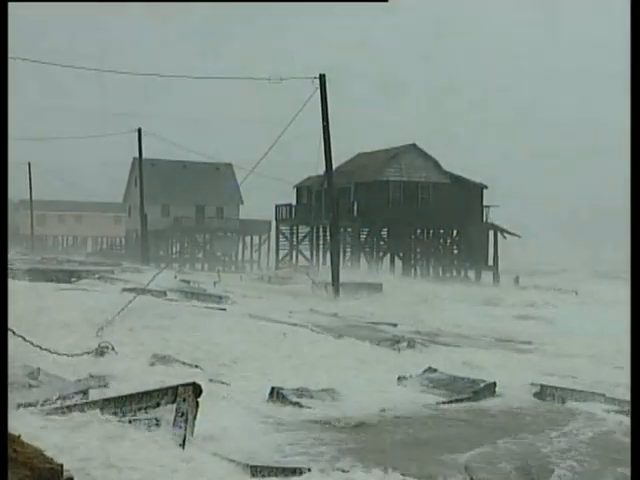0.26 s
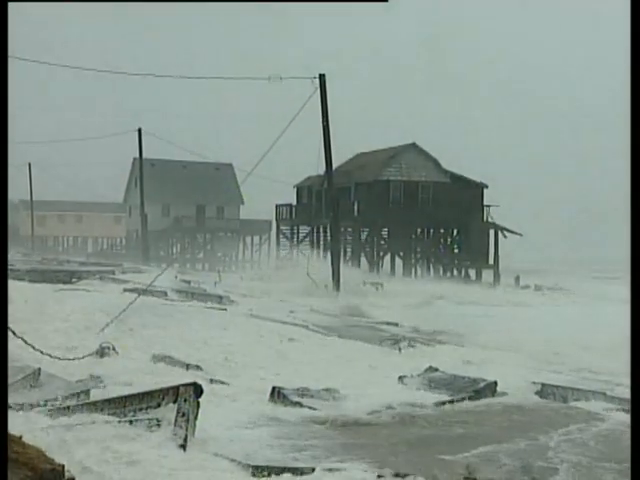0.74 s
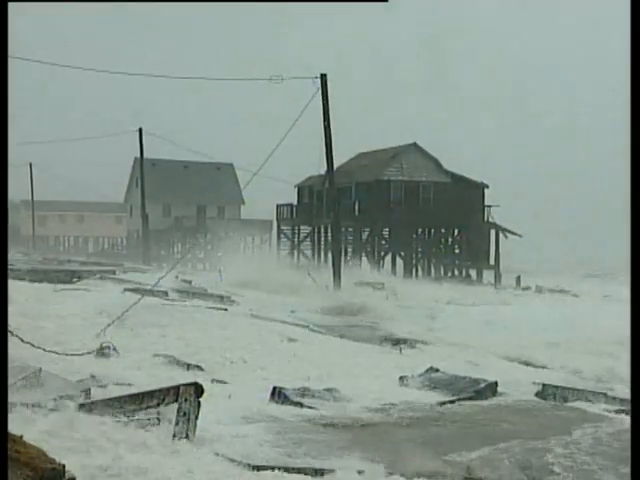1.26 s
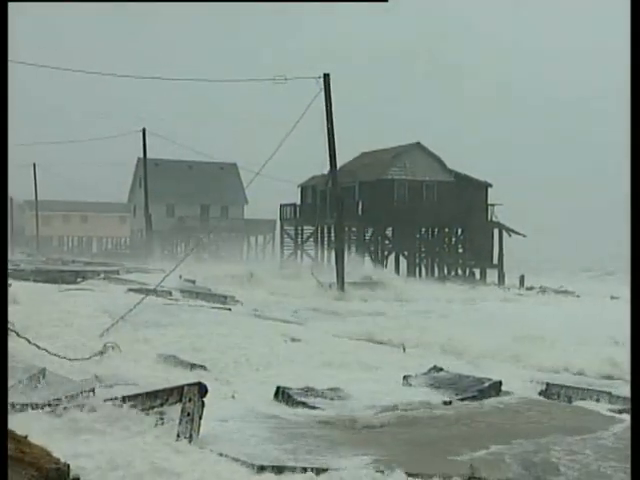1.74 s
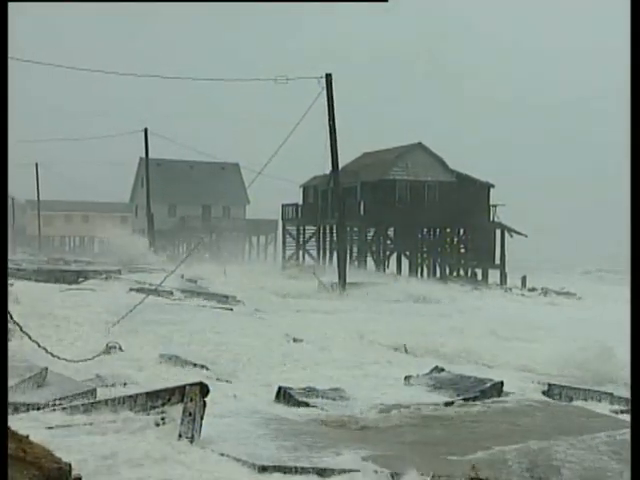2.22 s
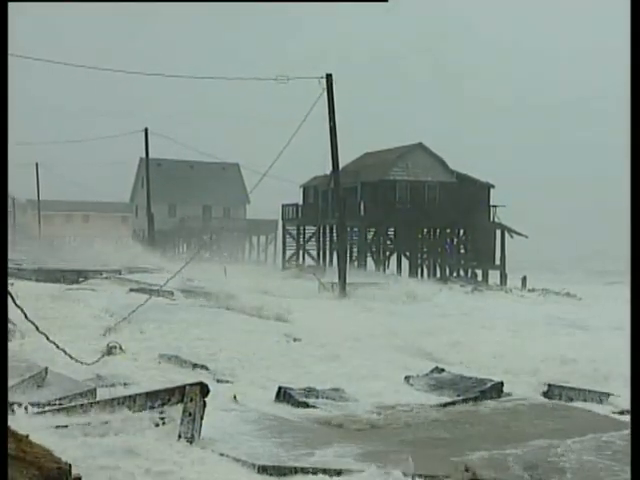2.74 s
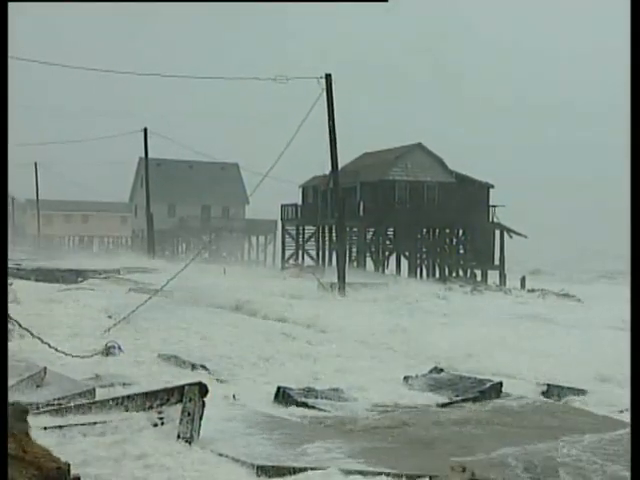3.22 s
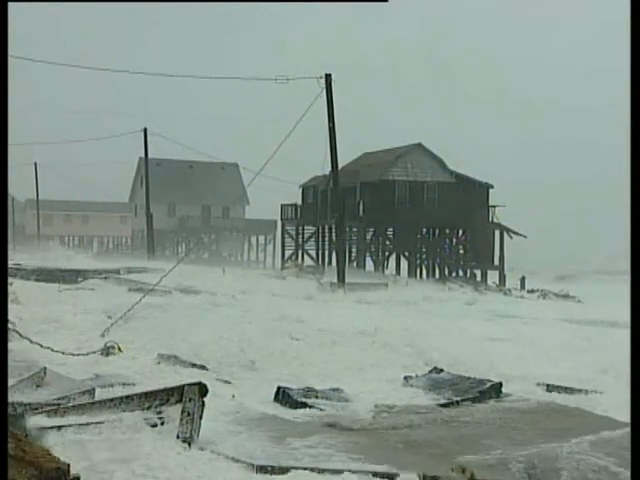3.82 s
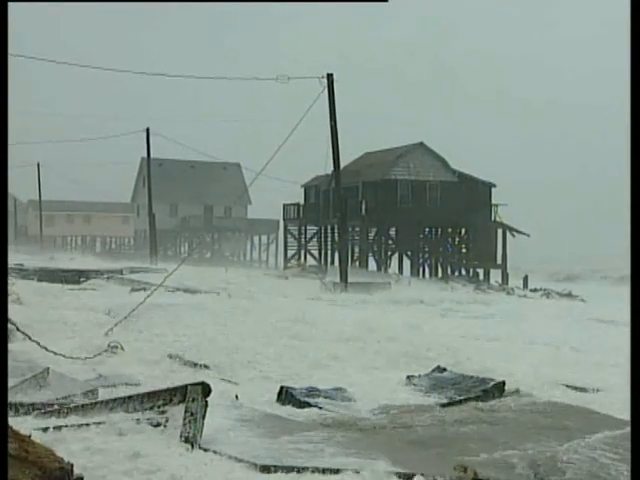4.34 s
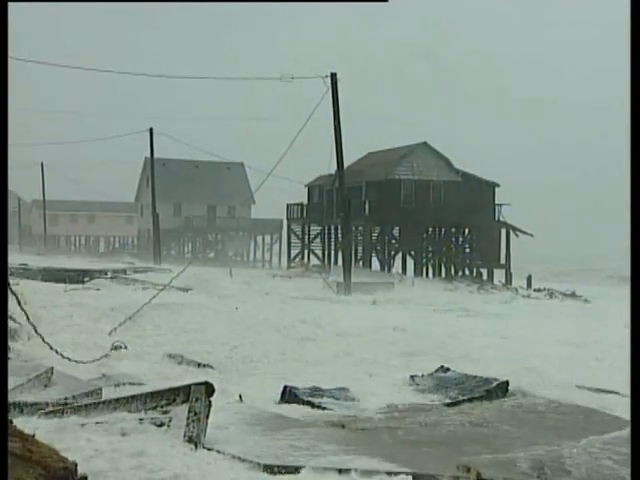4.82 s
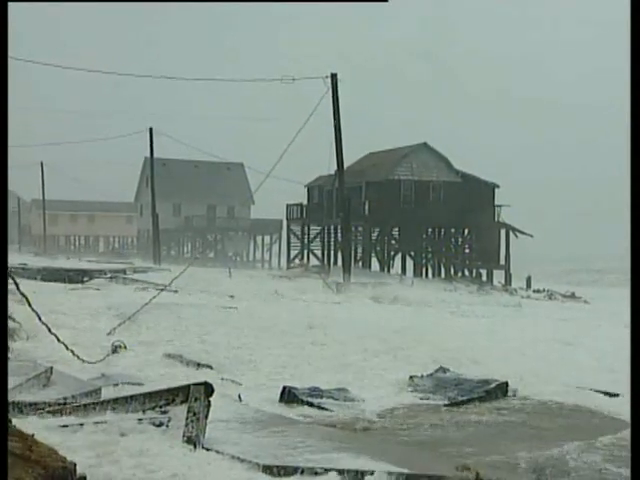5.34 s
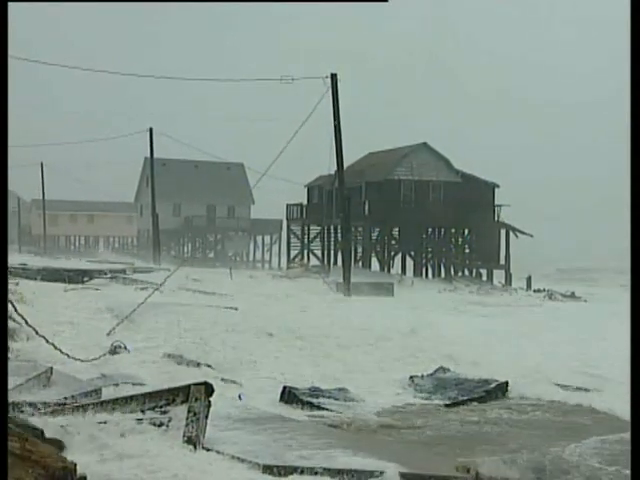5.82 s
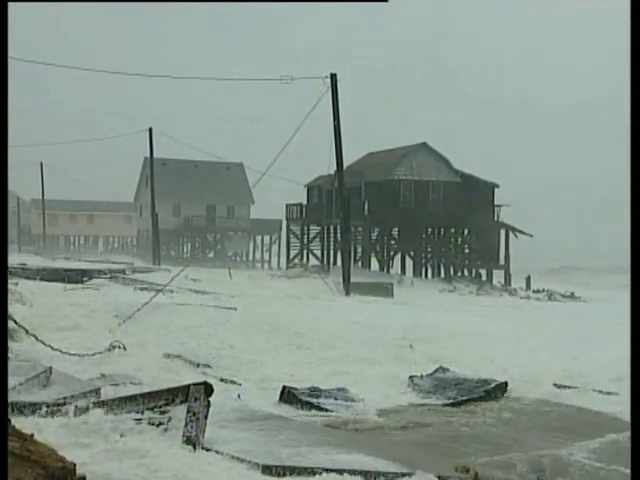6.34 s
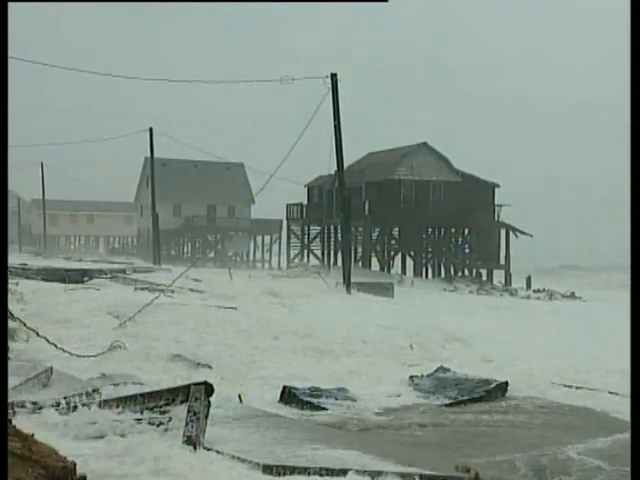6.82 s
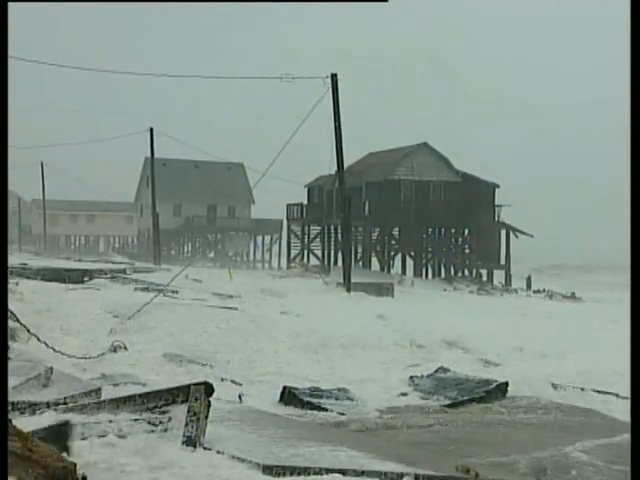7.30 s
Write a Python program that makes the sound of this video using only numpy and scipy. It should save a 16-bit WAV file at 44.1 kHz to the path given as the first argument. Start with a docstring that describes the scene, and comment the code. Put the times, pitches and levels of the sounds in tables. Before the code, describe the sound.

Hurricane wind hits an unprotected camera microphone on a surf-flooded beach, overloading it from start to finish. The sound is a ragged, clipped rumble and tearing crackle, with hissing surf and spray buried behind. It begins coarse and loud, turning finer by 0.75 s and again near 1.75 s, with quick flares around 0.8, 1.2 and 1.65 s. Near 2.45 s hard shoves choke it briefly and release with pops; a sharp, fine blast rips at 2.9 s. From 3.2 to 4.5 s it eases into coarser, lower buffeting, with lone pops near 4.2 s and bursts at 4.4-4.6 s. Fine crackle returns by 5.6 s; a thin lull at 5.75-5.85 s holds several tiny pops, then a longer choke releases at 5.92 s. It sinks to coarse rumble near 6.35 s, then crackles finely again to an abrupt end. Left side only; the right has barely audible hiss.

```python
"""Hurricane wind overloads a camera microphone: eddies flip it between two limits, a tearing crackle.
The crackle swells slowly, flares in blasts and thins in lulls; lone eddies pop within some lulls.
Hard shoves pin the microphone for milliseconds, and it lets go with a pop.
Behind, surf and spray are noise added to the overloaded swing, hushed while it is pinned.
All this is on the left channel; the right holds only faint hiss."""
import sys
import numpy as np
from scipy import signal
from scipy.fft import rfft, irfft, next_fast_len
from scipy.io import wavfile
from scipy.ndimage import uniform_filter1d

SR = 44100
rng = np.random.default_rng(int(sys.argv[2]) if len(sys.argv) > 2 else 0)


def persist_wave(psi):
    """Save psi, clipped to +-1, as 16-bit WAV."""
    counts = np.round(np.clip(psi, -1, 1) * 32767).astype(np.int16)
    wavfile.write(sys.argv[1], SR, np.atleast_2d(counts).T)


N = 333837

# Pressure spectra, shape only: freq_hz, density_db_per_hz
COARSE_EDDY_SPECTRUM = [(8, -16), (30, 2.5), (100, -3.5), (300, -8), (1000, -17), (4000, -36.5),
                        (16000, -70)]
FINE_EDDY_SPECTRUM = [(50, -11), (400, -0.5), (1500, -3), (5000, -8.5), (16000, -17)]
# Slow swell of the gale: time_s, fine_over_coarse_db, crackle_level_db
GALE_SWELL = [(0, -7.5, -20.5), (0.5, -3.5, -20), (0.75, -2, -20.5), (1.2, -5, -19.5), (1.5, -3, -22),
              (1.75, -0.5, -19.5), (2.05, -2.5, -22.5), (2.4, -2.5, -23), (2.8, -0.5, -21),
              (3.2, -4, -24.5), (3.6, -7, -24.5), (3.87, -8, -23), (4.33, -11.5, -28.5), (4.5, -12.5, -23),
              (5.05, -5, -22.5), (5.6, 0, -23), (6.35, -10, -21.5), (6.95, -3, -23), (7.57, -1.5, -24)]
# Blasts that tear at the microphone: start_s, length_s, louder_db, finer_db
BLASTS = [(0.195, 0.078, 1, 0.5), (0.837, 0.029, 4, 1), (1.026, 0.057, 1.5, -0.5), (1.18, 0.13, 1.5, 2),
          (1.655, 0.073, 1, -1.5), (1.96, 0.028, 1.5, 5), (2.461, 0.056, 4, -2.5), (2.75, 0.044, 1, 3.5),
          (2.89, 0.046, 3.5, 14), (2.943, 0.11, 3, -1), (3.238, 0.035, 3, -0.5), (4.122, 0.067, 3.5, 5),
          (4.44, 0.028, 5.5, 3.5), (4.615, 0.098, 2, 4.5), (4.944, 0.069, 1.5, 0), (5.681, 0.049, 5.5, 8),
          (5.79, 0.023, 5.5, -17), (5.933, 0.025, 4, -4), (6.348, 0.062, 1.3, -1), (7.176, 0.035, 3, -4)]
# Lulls, microphone resting near one limit: start_s, length_s, pull_spreads (negative = push), quieter_db
LULLS = [(0.102, 0.069, 0.79, 3), (0.284, 0.033, 0.89, 1.5), (0.7, 0.037, 0.49, 2.1),
         (0.893, 0.064, 1.3, 2.8), (1.102, 0.029, 2.1, 3), (1.349, 0.044, 1.7, 6.5), (1.773, 0.15, 0.9, 1),
         (2.043, 0.045, 0.8, 1.5), (3.062, 0.078, 1.6, 2.5), (3.283, 0.046, 0.72, -1.5),
         (3.958, 0.078, 0.75, 2), (4.184, 0.13, 1.27, -1.5), (4.31, 0.039, 0.3, 1), (4.755, 0.076, 0.84, 5),
         (4.838, 0.057, 0.025, 3.5), (5.438, 0.17, 0.93, 0), (5.75, 0.09, 2.3, 10.5),
         (5.988, 0.057, 1.4, 2.5), (6.12, 0.086, 1.5, 4.5), (6.205, 0.062, 0.13, 8),
         (6.282, 0.055, -0.53, 3.5), (6.561, 0.075, 0.5, 3), (6.758, 0.13, 0.18, 3), (7.078, 0.047, 1, 1),
         (7.39, 0.064, 0.96, 1), (7.528, 0.06, 0.6, 0)]
# Shoves that pin the microphone: release_time_s, length_s, hush_db
SHOVES = [(0.31, 0.008, 6), (0.348, 0.01, 10.5), (0.454, 0.015, 8), (0.836, 0.0081, 10), (1.03, 0.019, 33),
          (1.164, 0.018, 8.5), (1.974, 0.0064, 19), (2.447, 0.027, 22), (2.468, 0.017, 33),
          (2.659, 0.0095, 9.5), (2.732, 0.0066, 13.5), (2.839, 0.0082, 11.5), (2.869, 0.0075, 24),
          (3.216, 0.0077, 9), (3.25, 0.003, 24), (4.062, 0.013, 14.5), (4.12, 0.0098, 1.5),
          (4.198, 0.011, 13), (4.237, 0.008, 16), (4.296, 0.013, 16), (4.364, 0.019, 7),
          (4.611, 0.013, 6.5), (4.707, 0.0086, 12.5), (4.929, 0.018, 12.5), (5.178, 0.0077, 17),
          (5.219, 0.011, 7.5), (5.398, 0.007, 17.5), (5.583, 0.0088, 18.5), (5.674, 0.024, 14),
          (5.829, 0.013, 9.5), (5.923, 0.061, 29.5), (6.059, 0.017, 9.5), (6.274, 0.018, 14),
          (6.44, 0.011, 11.5), (6.742, 0.011, 7.5), (7.153, 0.014, 11.5), (7.183, 0.022, 15.5),
          (7.281, 0.0085, 18.5)]
# Lone eddies that flip the microphone over and back within a lull: start_s, length_s
POPS = [(4.199, 0.0016), (4.266, 0.0027), (5.7625, 0.00043), (5.771, 0.0004), (5.783, 0.0012),
        (5.796, 0.00197), (5.833, 0.00075)]
# Spectrum of the random level flutter, shape only: freq_hz, density_db_per_hz
FLUTTER_SPECTRUM = [(3, -9), (8, -1), (25, 6), (80, -28), (1000, -80)]
# Wash spectra, shape only: freq_hz, density_db_per_hz
SURF_SPECTRUM = [(20, 2), (150, -2), (600, -8.5), (2000, -7.5), (16000, -23.5)]
SPRAY_SPECTRUM = [(100, -15), (1000, -7), (4000, -6), (16000, -8)]
# Microphone colour: freq_hz, gain_db
MIC_COLOUR = [(25, 4), (60, 0.3), (150, 0), (400, -0.5), (1000, 0.03), (2500, 0.2), (6000, 0.5),
              (11000, 0.96), (16000, 0.4)]

# Pressures are in spreads (rms) of the eddy pressure
LEAN_SPREADS, POP_PUSH_SPREADS = -0.38, 2.3   # LEAN: steady pressure between events
BLAST_ATTACK_S, BLAST_RELEASE_S, LULL_EDGE_S = 0.0053, 0.016, 0.024
LULL_FINER_DB_PER_SPREAD = 5
FLUTTER_RMS_DB = 0.85
NUDGES_PER_S, NUDGE_S, NUDGE_MEAN_HUSH_DB = 1.5, 0.0059, 4.5
# Build-up ahead of a shove of FULL_SHOVE_DB or more; less for weaker ones
MOUNT_S, MOUNT_PUSH_SPREADS, MOUNT_COARSER_DB, MOUNT_QUIETER_DB = 0.034, 1.29, 8.5, 3.5
FULL_SHOVE_DB = 20.5
COUPLING_HZ, CUTOFF_HZ = 23, 15900
RIGHT_HISS_DB = -86.5   # ahead of the microphone colour


def wind_pressure(steady, fine_share, slack):
    """Coarse buffets and fine eddies ride on the steady push; as it slackens, fine eddies take over."""
    coarse_share = np.sqrt(1 - fine_share ** 2)   # total eddy power stays 1
    push = steady + coarse_share * noise(COARSE_EDDY_SPECTRUM)
    return (1 - slack) * push + fine_share * noise(FINE_EDDY_SPECTRUM)


def overloaded(pressure, wash, drive, top_hardness):
    """The microphone saturates at two limits; slightly less wash passes near the upper, harder one."""
    swing = np.tanh(drive * pressure)
    wash_gain = 1 - np.clip(top_hardness, 0, 1) * swing
    return swing + wash * wash_gain


def gale():
    """Blasts, lulls and mounting shoves shape the swell: steady pressure, fineness in dB, level in dB."""
    fine_db, level_db = in_time(GALE_SWELL)
    mount = mounting()
    steady = LEAN_SPREADS + MOUNT_PUSH_SPREADS * mount
    fine_db = fine_db - MOUNT_COARSER_DB * mount
    level_db = level_db - MOUNT_QUIETER_DB * mount
    for start_s, length_s, louder_db, finer_db in BLASTS:
        blast = plateau(start_s, length_s, BLAST_ATTACK_S, BLAST_RELEASE_S)
        level_db += louder_db * blast
        fine_db += finer_db * blast
    for start_s, length_s, pull_spreads, quieter_db in LULLS:
        lull = plateau(start_s, length_s, LULL_EDGE_S, LULL_EDGE_S)
        steady -= pull_spreads * lull
        fine_db += LULL_FINER_DB_PER_SPREAD * pull_spreads * lull
        level_db -= quieter_db * lull
    flutter_db = FLUTTER_RMS_DB * noise(FLUTTER_SPECTRUM)
    return steady, fine_db, level_db + flutter_db


def mounting():
    """Pressure mounts exponentially ahead of each shove and is gone at its release, 0-1."""
    t, mount = np.arange(N) / SR, np.zeros(N)
    for end_s, length_s, hush_db in SHOVES:
        lead_s = end_s - length_s - t
        rise = np.exp(-np.clip(lead_s / MOUNT_S, 0, 20)) * (t < end_s)
        mount = np.maximum(mount, min(hush_db / FULL_SHOVE_DB, 1) * rise)
    return mount


def shoves(build_share, release_s, rebound_s):
    """A shove squeezes the microphone, then lets go: share of travel left, and rebound after it (0-1)."""
    t, hush_db, rebound = np.arange(N) / SR, np.zeros(N), np.zeros(N)
    for end_s, length_s, depth_db in list(SHOVES) + nudges():
        since_s = t - end_s
        build = np.clip((since_s + length_s) / (build_share * length_s) + .5, 0, 1)
        release = np.clip(.5 - since_s / release_s, 0, 1)
        hush_db = np.maximum(hush_db, depth_db * build * release)
        decay = np.exp(-np.clip(since_s / rebound_s, 0, 20))
        rebound = np.maximum(rebound, (since_s > 0) * decay)
    return from_db(-hush_db), rebound


def nudges(count=60):
    """Slight shoves at random moments (exponential gaps), as rows like SHOVES."""
    draws = rng.random((count, 2))
    ends_s = np.cumsum(-np.log(1 - draws[:, 0])) / NUDGES_PER_S
    hushes_db = NUDGE_MEAN_HUSH_DB * (.5 + draws[:, 1])
    return [(end_s, NUDGE_S, hush_db) for end_s, hush_db in zip(ends_s, hushes_db) if end_s < N / SR]


def pops():
    """Lone eddies: short rectangular kicks of pressure."""
    t = np.arange(N) / SR
    return POP_PUSH_SPREADS * sum((t >= start_s) & (t < start_s + length_s) for start_s, length_s in POPS)


def crackle_rms(swing, low_hz, window_s):
    """Running rms of the crackle above the rumble, with a small floor."""
    highpass = signal.butter(2, low_hz, "high", fs=SR, output="sos")
    power = signal.sosfilt(highpass, swing) ** 2
    width = int(window_s * SR)
    smooth_power = uniform_filter1d(uniform_filter1d(power, width), width)
    return np.sqrt(smooth_power + 1e-3)


def sagging(swing):
    """The microphone's coupling lets held pressure sag to zero, so releases thump."""
    return signal.sosfilt(signal.butter(2, COUPLING_HZ, "high", fs=SR, output="sos"), swing)


def sea(fine_share, surf_db, spray_db):
    """Surf is steady noise; blown spray is noise that thickens with the fine eddies."""
    surf = from_db(surf_db) * noise(SURF_SPECTRUM)
    spray = from_db(spray_db) * fine_share * noise(SPRAY_SPECTRUM)
    return surf + spray


def noise(spectrum):
    """Gaussian noise of the given spectrum, rms 1."""
    x = coloured(rng.standard_normal(N), spectrum)
    return x / x.std()


def coloured(x, spectrum):
    """Filter by a curve of freq_hz, gain_db, interpolated over log frequency."""
    size = next_fast_len(N + SR // 4)
    hz, db = np.transpose(spectrum)
    bins_hz = np.maximum(np.fft.rfftfreq(size, 1 / SR), 1)
    gain = from_db(np.interp(np.log(bins_hz), np.log(hz), db))
    return irfft(rfft(x, size) * gain, size)[:N]


def plateau(start_s, length_s, attack_s, release_s):
    """Linear attack, hold and release, 0-1; the edges are centred on start and end."""
    since_s = np.arange(N) / SR - start_s
    attack = np.clip(since_s / attack_s + .5, 0, 1)
    return attack * np.clip((length_s - since_s) / release_s + .5, 0, 1)


def in_time(rows):
    """Each column of a curve at every sample."""
    time_s, *columns = np.transpose(rows)
    return [np.interp(np.arange(N) / SR, time_s, column) for column in columns]


def from_db(db):
    """Decibels to gain."""
    return 10 ** (np.asarray(db) / 20)


def scene():
    """Wind and sea through the overloaded microphone (left), hiss (right)."""
    steady, fine_db, level_db = gale()
    fine_ratio = from_db(fine_db)
    fine_share = fine_ratio / np.sqrt(1 + fine_ratio ** 2)
    free, rebound = shoves(build_share=0.25, release_s=0.0045, rebound_s=0.0027)
    pressure = wind_pressure(steady + pops(), fine_share, slack=.5 * rebound)
    wash = sea(fine_share, surf_db=-15.0, spray_db=-13.5)
    swing = overloaded(pressure, wash, drive=3.77, top_hardness=0.097)
    # level the crackle, then let it follow the gale
    gain = from_db(level_db) / crackle_rms(swing, low_hz=149, window_s=0.03)
    pinned = free * swing + 0.96 * (1 - free)   # held near the upper limit
    right = from_db(RIGHT_HISS_DB) * rng.standard_normal(N)
    return np.array([gain * sagging(pinned), right])


def record(dry):
    """Microphone colour and a steep top cut."""
    toned = np.array([coloured(channel, MIC_COLOUR) for channel in dry])
    return signal.sosfilt(signal.ellip(12, .1, 90, CUTOFF_HZ, fs=SR, output="sos"), toned)


dry = scene()
out = record(dry)
persist_wave(out)
```